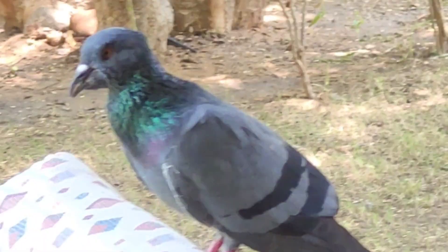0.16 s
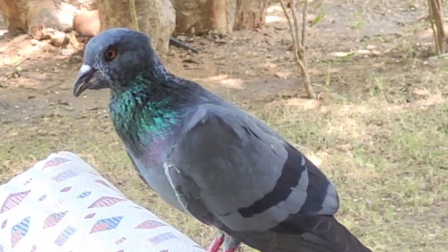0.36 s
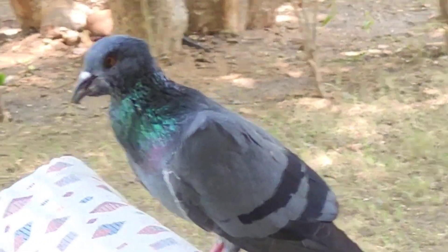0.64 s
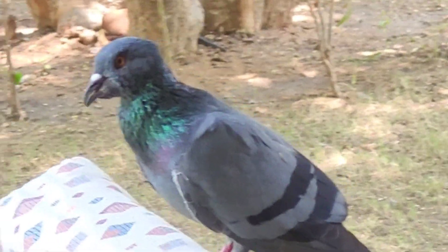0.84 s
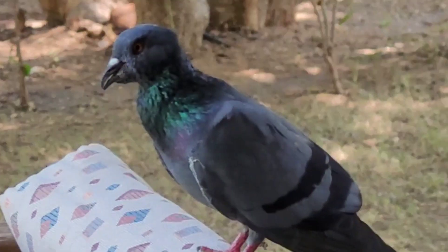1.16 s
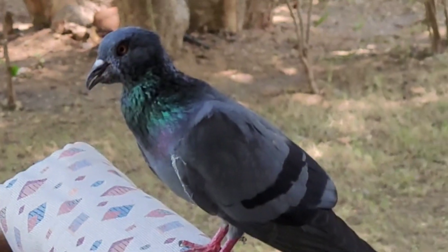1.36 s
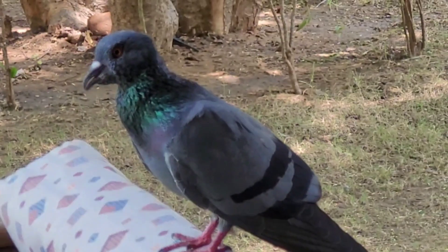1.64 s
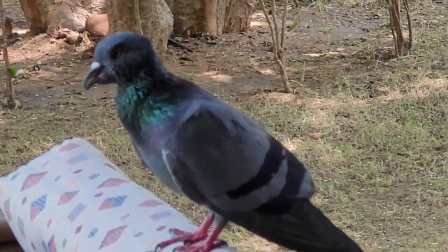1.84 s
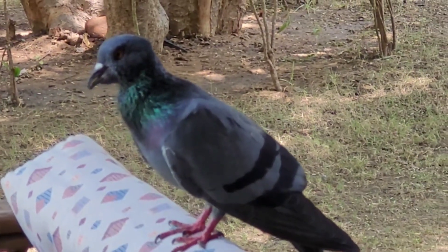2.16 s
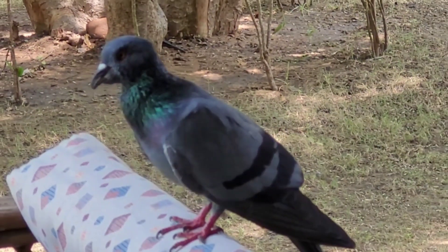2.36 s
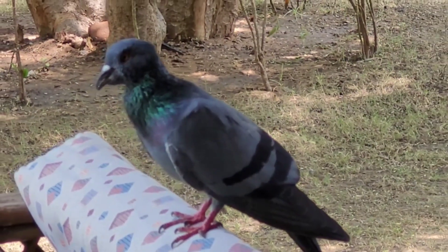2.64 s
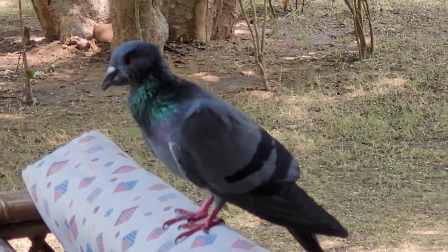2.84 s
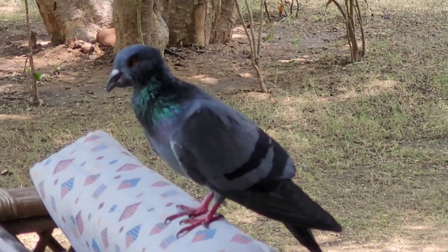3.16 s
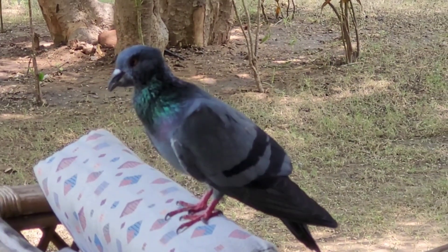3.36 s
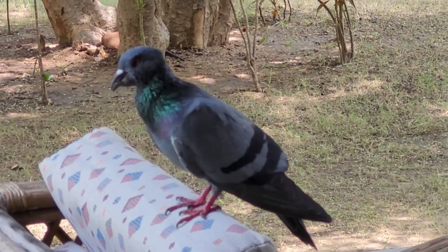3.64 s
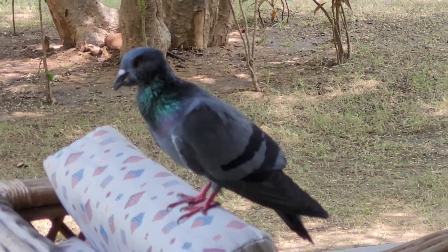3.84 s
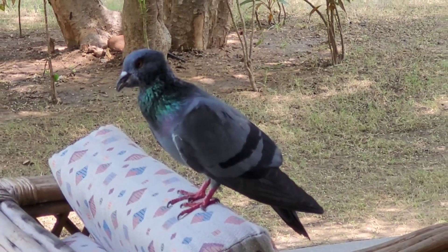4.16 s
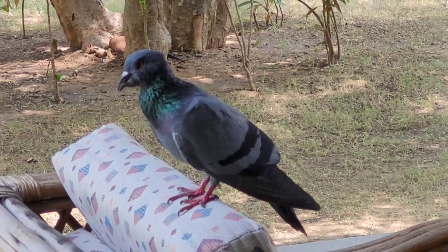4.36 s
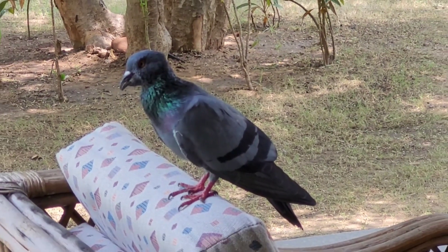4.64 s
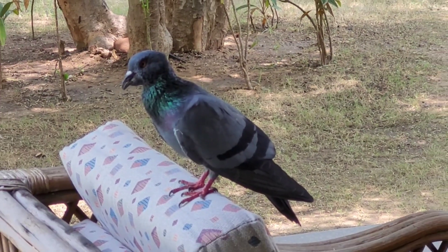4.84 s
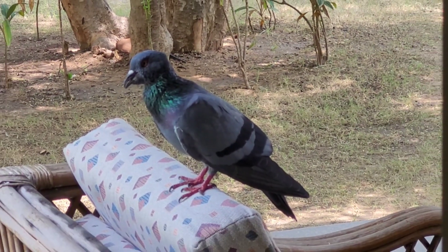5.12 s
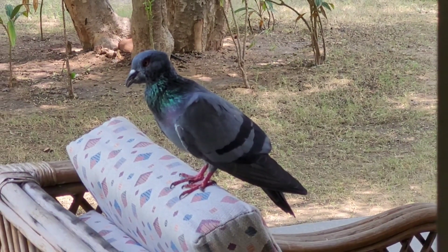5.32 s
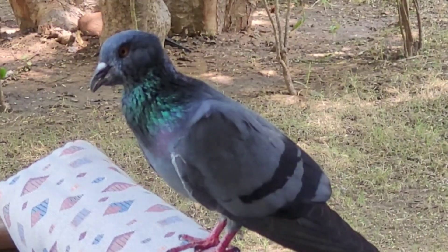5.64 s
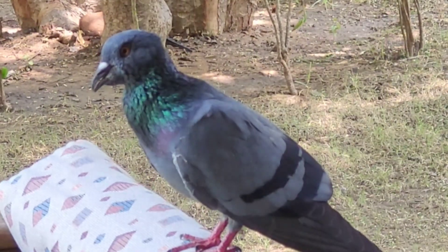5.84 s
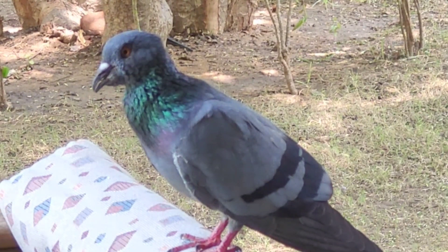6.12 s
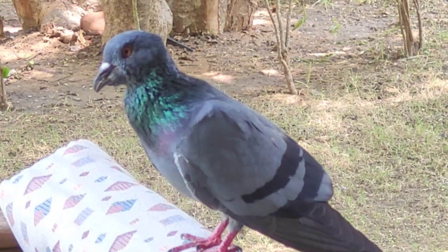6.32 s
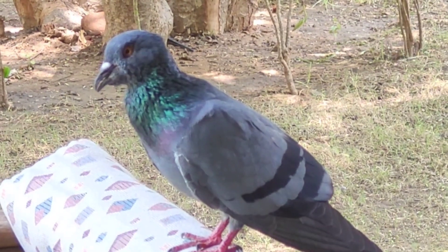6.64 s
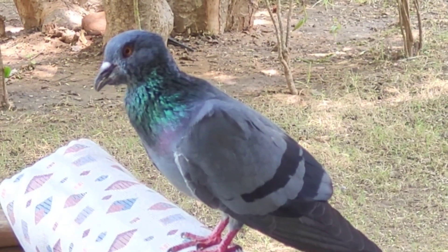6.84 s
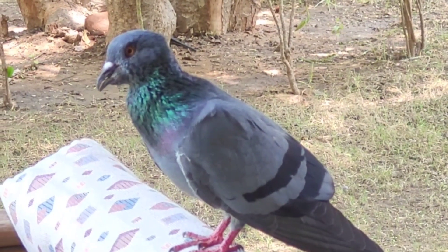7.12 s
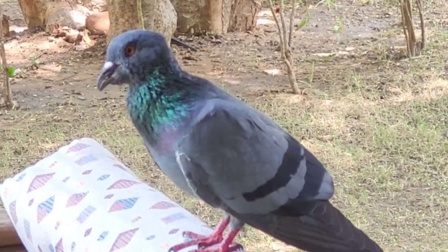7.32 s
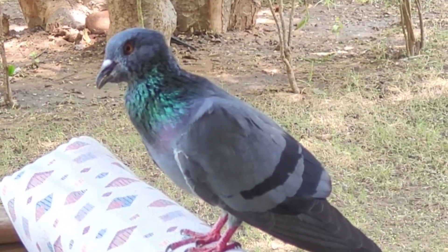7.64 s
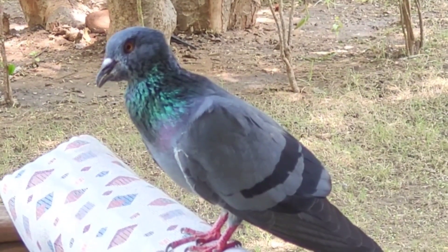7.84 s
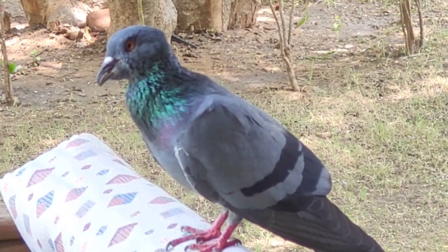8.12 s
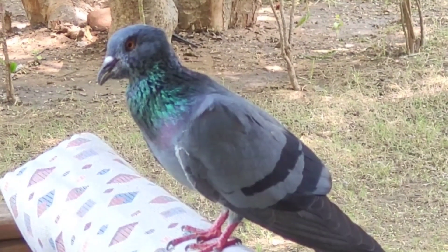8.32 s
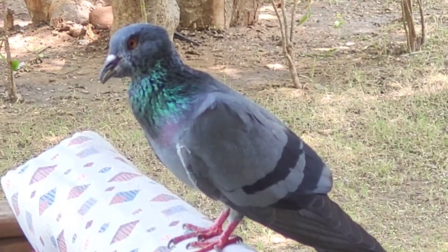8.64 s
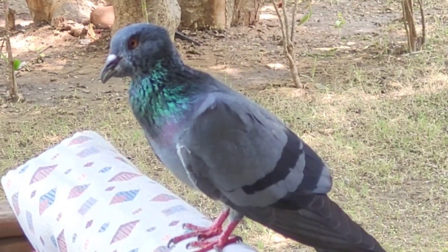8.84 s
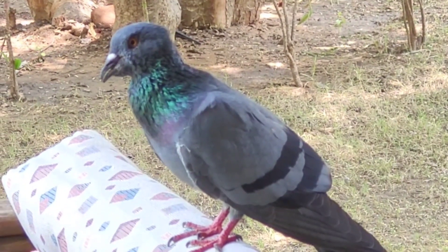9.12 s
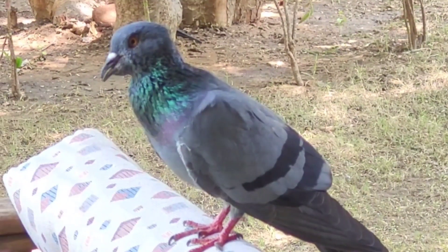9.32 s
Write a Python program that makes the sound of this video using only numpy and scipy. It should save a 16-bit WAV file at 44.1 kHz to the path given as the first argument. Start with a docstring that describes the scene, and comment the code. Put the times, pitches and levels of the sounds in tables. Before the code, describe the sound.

A close garden songbird strings chups, sliding whistles, hoarse screeches and buzzy rasps into quick phrases, with faint distant birds chattering behind.

```python
"""A near babbler in a garden strings chups, slides, whistles, screeches and rasps into quick phrases.
Each kind of syllable has one rule for the pitch and effort of the syrinx, and a throat setting that
weights its partials; ground, walls and trees throw the song back as echoes and scattered tails.
Other birds call far off, a flock comes in bouts of filtered noise, and a soft outdoor hum lies below.
The right microphone is covered: there the near bird is later, faint and dull."""
import sys
import numpy as np
from scipy import signal
from scipy.fft import rfft, irfft, next_fast_len
from scipy.io import wavfile

SR = 44100
rng = np.random.default_rng(int(sys.argv[2]) if len(sys.argv) > 2 else 0)


def put_to_file(sound):
    """Save the sound as 16-bit audio at rate SR, in the file named by the first command-line argument."""
    columns = np.atleast_2d(sound).T  # one column per channel
    safe = np.clip(columns, -1, 1)
    whole_steps = np.round(safe * 32767)
    wavfile.write(sys.argv[1], SR, whole_steps.astype(np.int16))


N = 418068
LEAD = SR // 4  # samples before the start, so that earlier calls still ring
EDGE_HZ = 15750  # upper edge of the band
SILENT_DB = -32.5  # effort at the two ends of a syllable


def gain_of(db):
    """Level law: decibels to an amplitude ratio."""
    return 10 ** (np.asarray(db) / 20)


def evened(x):
    """Power normalisation: scales to rms 1."""
    return x / np.sqrt(np.mean(x ** 2) + 1e-20)


def read(points, hz):
    """Logarithmic pitch scale: interpolates a spectrum along log frequency."""
    f, value = np.transpose(points)
    return np.interp(np.log(hz + 1), np.log(f + 1), value)


def level(curve):
    """Level envelope: gain at every sample from rows of start_s, level_db."""
    return gain_of(np.interp(np.arange(N) / SR, *np.transpose(curve)))


def coloured(x, points):
    """Linear filtering: multiplies the spectrum by gains given in dB."""
    size = next_fast_len(x.shape[-1] + 512)
    gains = gain_of(read(points, np.fft.rfftfreq(size, 1 / SR)))
    return irfft(rfft(x, size) * gains, size)[..., :x.shape[-1]]


def above(x, edge_hz):
    """High-pass filtering: second-order attenuation below the edge."""
    return signal.sosfilt(signal.butter(2, edge_hz, "high", fs=SR, output="sos"), x)


def wander(size, rate_hz):
    """Low-passed noise: smooth random drift of rms about 1, slower than the given rate."""
    hz = np.fft.rfftfreq(next_fast_len(size + SR // 8), 1 / SR)
    noise = rfft(rng.standard_normal(2 * len(hz) - 2))
    return evened(irfft(noise / (1 + (hz / rate_hz) ** 4)))[:size]


def ramp(t, at, over):
    """Raised-sine transition: a smooth step from 0 to 1, centred on a moment."""
    return (1 + np.sin(np.pi * np.clip((t - at) / over, -.5, .5))) / 2


def bump(t, at, width):
    """Gaussian pulse: a bell of height 1."""
    return np.exp(-((t - at) / width) ** 2)


def add(mix, start, sound):
    """Superposition: mixes a sound in at a sample index."""
    part = mix[start:][:len(sound)]
    part += sound[:len(part)]


def song(gesture, rows):
    """Sequencing: places one syllable of a kind at the start time of each row."""
    out = np.zeros(LEAD + N)
    for start_s, *row in rows:
        add(out, LEAD + round(start_s * SR), gesture(*row))
    return out


def scatter(t60, onset):
    """Diffuse reverberation: sparse taps of random sign build up, then decay by band; energy 1."""
    taps = rng.choice([-1., 1.], SR) * (rng.random(SR) < 1 / 10)
    hz, t, z = signal.stft(taps, SR, nperseg=256)
    decay = gain_of(-60 * t / read(t60, hz)[:, None])
    tail = signal.istft(z * decay, SR, nperseg=256)[1][:SR]
    tail *= 1 - np.exp(-(np.arange(SR) / SR / onset) ** 2)
    return tail / np.linalg.norm(tail)


def heard(x, response):
    """Convolution: passes a song through an impulse response and drops the lead-in."""
    return signal.fftconvolve(x, response)[LEAD:LEAD + N]


def effort(t, attack_s, release_s):
    """Breath-pressure envelope: attack, hold and release, in dB."""
    attack = np.maximum(1 - t / attack_s, 0) ** 2
    release = np.maximum(1 - (t[-1] - t) / release_s, 0) ** 2
    return SILENT_DB * (attack + release)


# Resonance curves of the throat, one per setting: frequency_hz, relative gain_db
THROAT_SETTINGS = { "low": [(1100, -14), (1900, -8), (2500, 5.5), (3200, 3), (3900, -15.5), (5000, -10),
                   (5900, -12), (7000, -19), (10000, -28), (13000, -24.5), (14500, -13.5), (16000, -51.5)],
                   "pip": [(1500, -10), (2400, -7), (3400, 4), (4300, -33.5), (7500, -19), (9000, -40),
                   (16000, -38.5)], "pure": [(300, -40), (2500, -23), (3500, -4), (4700, -7), (5600, -18.5),
                   (6600, -23), (7700, -17), (9000, -42), (11000, -33), (13500, -29), (16000, -45)],
                   "flick": [(1500, -32.5), (3400, -6.5), (4800, 6), (6900, -1.5), (8200, -28),
                   (11000, -15.5), (16000, -28.5)], "slide": [(300, -19), (1500, -13.5), (2400, -16),
                   (3500, 8), (5000, -3.5), (6200, -14.5), (7500, -16.5), (10000, -26.5), (12500, -25.5),
                   (15000, -23)], "whistle": [(300, -13), (2000, -21.5), (3200, -12.5), (5000, 0.5),
                   (6200, -13), (7300, -6), (8500, -28.5), (10500, -34.5), (12500, -27), (15300, -28.5)],
                   "screech": [(300, -19), (1900, -35.5), (2400, -35), (2800, -22.5), (3400, -26.5),
                   (4300, -5.5), (5200, 4.5), (5700, -6), (6600, -27), (8000, -14.5), (9200, -23.5),
                   (10700, -23), (15500, -24)], "rasp": [(1300, -47), (1800, -29.5), (2500, -22.5),
                   (3200, -36.5), (4100, -10.5), (5200, 2), (6500, -13), (7800, -18), (9400, -14.5),
                   (11800, -20.5), (13300, -12), (16000, -27.5)], "chip": [(300, -26), (1600, -46),
                   (2400, -22.5), (3100, -20), (3700, 4), (4500, -1.5), (5300, -22.5), (7500, -13.5),
                   (9000, -39), (10600, -20), (16000, -42.5)], "far": [(1300, -44), (2100, 8.5),
                   (2900, 2.5), (3900, -16.5), (5400, 0.5), (6600, -10.5), (8000, -39.5), (16000, -33)]}


def syllable(setting, level_db, hz, effort_db, rough, waver=0.011, jitter=0.042, split=1.0, air=0.12,
             flutter_db=5.5, bright=0.093, fizz_db=-40):
    """Source and filter: a membrane follows the gesture; driven rough, it jitters, period-doubles and hisses."""
    throat = THROAT_SETTINGS[setting]
    t = np.arange(len(hz)) / SR
    rough = np.clip(rough, 0, 1)
    hz = hz * (1 + waver * wander(len(t), rate_hz=230))
    jittered_hz = hz * (1 + jitter * rough * wander(len(t), rate_hz=480))
    phase = 2 * np.pi * np.cumsum(jittered_hz) / SR

    halves = np.arange(2, 2 * int(EDGE_HZ / np.median(hz)) + 4)[:, None]  # odd ones lie between the harmonics
    order = halves / 2
    treble = np.clip(order * hz / 5500 - 1, 0, 1)  # 0 up to 5.5 kHz, 1 from an octave above it
    colour_db = read(throat, order * hz) + bright * treble * effort_db  # soft notes are duller
    heights = gain_of(colour_db) * np.where(halves % 2, 2 * split * rough ** 2, 1)
    heights *= order * hz < SR / 2
    heights /= np.sqrt((heights ** 2).sum(0) / 2)

    # high partials lose their line as the phase frays
    drift = wander(treble.size, rate_hz=580).reshape(treble.shape)
    fray = 1.7 * np.sqrt(rough) * (treble + np.minimum(rough, 1 / 2) ** 2) * drift
    start_phase = rng.uniform(0, 2 * np.pi, order.shape)
    tone = (heights * np.cos(order * phase + fray + start_phase)).sum(0)

    hiss = air * rough * evened(coloured(rng.standard_normal(len(t)), throat))
    open_bill_air = evened(above(rng.standard_normal(len(t)), 7000))
    fizz = gain_of(fizz_db) * np.sqrt(rough) * open_bill_air
    loudness = gain_of(level_db + effort_db + flutter_db * rough * wander(len(t), rate_hz=320))
    window = signal.windows.tukey(len(t), .04)
    return above((tone + hiss + fizz) * loudness * window, edge_hz=1300)


# Spectrum of the outdoor hum: frequency_hz, relative density_db
HUM_SPECTRUM = [(25, -44), (60, -16.5), (90, -4.5), (150, -6.5), (380, -2.5), (520, -7), (680, -16.5),
                (850, -12), (1250, -24), (3000, -18.5), (7000, -44.5), (15500, -33)]
# Level of the hum: start_s, level_db
HUM_LEVEL = [(1.4, -65), (1.9, -69), (2.35, -64.5), (3.0, -68), (3.9, -66.5), (4.3, -65), (5.7, -63),
             (6.4, -67.5)]


def hum():
    """Incoherent ambient noise: soft and low, unrelated at the two ports."""
    return evened(coloured(rng.standard_normal((2, N)), HUM_SPECTRUM)) * level(HUM_LEVEL)


# Blended spectrum of many distant voices: frequency_hz, relative gain_db
FLOCK_SPECTRUM = [(800, -27), (1500, -13), (2400, -5), (3300, -4), (4400, 2.5), (5400, -2), (6500, -9),
                  (8000, -28), (10000, -39.5)]
# Bouts of chatter in the distant flock: middle_s, bell_width_s, level_db
FLOCK_BOUTS = [(0, 0.76, -68.5), (2.965, 0.64, -73), (5.764, 0.5, -59), (6.67, .35, -54),
               (8.406, 1.34, -66.5)]
FLOCK_REST_DB = -84.5  # floor under the bouts


def flock(swell_db=1.0):
    """Incoherent summation: many far voices blur into a high, restless wash that comes in bouts."""
    wash = evened(coloured(rng.standard_normal((2, N)), FLOCK_SPECTRUM))
    bouts = gain_of(FLOCK_REST_DB)
    for middle_s, width_s, level_db in FLOCK_BOUTS:
        bouts = bouts + gain_of(level_db) * bump(np.arange(N) / SR, middle_s, width_s)
    return wash * bouts * gain_of(swell_db * wander(N, rate_hz=9))


# Squawks far off, before the distant path: start_s, length_s, level_db, top_hz
FAR_SQUAWKS = [(0.495, .11, -69, 2320), (2.625, 0.14, -59, 3196), (2.837, 0.14, -56.5, 2720),
               (3.066, 0.09, -64, 2483), (3.282, 0.066, -63.5, 2793)]


def squawk(length, level_db, top_hz, crest_share=0.33, droop_share=0.52, swell_db=6, rough=.6):
    """Parabolic frequency sweep: a hoarse arch that swells into its long fall."""
    t = np.arange(0, length, 1 / SR)
    swelling_db = level_db + swell_db * (t / length - 1 / 2)
    hz = top_hz * (1 - droop_share * (t / length - crest_share) ** 2)
    return syllable("far", swelling_db, hz, effort(t, attack_s=0.014, release_s=0.011), rough)


def peep(level_db, length_s, start_hz, end_hz, rough):
    """Linear frequency sweep: a plain glide."""
    t = np.arange(0, length_s, 1 / SR)
    hz = start_hz + (end_hz - start_hz) * t / length_s
    return syllable("whistle", level_db, hz, effort(t, attack_s=0.012, release_s=0.016), rough,
                    waver=0.022, air=.6, bright=0.34)


SEESAW_START_S, SEESAW_PERIOD_S, SEESAW_GAP_S = 2.8, .188, 0.033  # gap: falling to rising onset


def seesaw(count=6):
    """Periodic repetition: a far bird's falling and rising peeps at an even pace."""
    out = np.zeros(LEAD + N)
    for s in SEESAW_START_S + SEESAW_PERIOD_S * np.arange(count):
        falling = peep(level_db=-57.5, length_s=.032, start_hz=5100, end_hz=3760, rough=.35)
        add(out, LEAD + round(s * SR), falling)
        rising = peep(level_db=-60, length_s=.05, start_hz=4600, end_hz=5980, rough=0.45)
        add(out, LEAD + round((s + SEESAW_GAP_S) * SR), rising)
    return out


def far_birds(direct_db=-6, trees_db=-1):
    """Diffuse field beyond the direct field: distant calls arrive mostly by way of the trees."""
    voice = song(squawk, FAR_SQUAWKS) + seesaw()
    ports = []
    for port in range(2):
        by_trees = heard(voice, scatter([(1000, 0.58)], onset=.006))
        ports.append(gain_of(direct_db) * voice[LEAD:] + gain_of(trees_db) * by_trees)
    return np.array(ports)


# Echoes off ground and walls: delay_s, relative level_db
GROUND_AND_WALLS = [(.0031, -17.5), (.0074, -16.5), (0.0095, -14.5), (0.018, -22), (0.027, -20.5),
                    (0.04, -23.5)]
# Colour of everything thrown back: frequency_hz, gain_db
REFLECTION_COLOUR = [(500, -2), (3400, 8), (4300, -4), (5500, -4.5), (8000, -7.5), (16000, -16.5)]
# Decay time among the trees: frequency_hz, t60_s
TREES_T60 = [(500, 0.37), (3000, 0.31), (5000, 0.36), (8000, 0.23), (15000, 0.21)]


def garden(echo_db, porch_db, trees_db, porch_t60=0.088):
    """Impulse response of one port: direct sound, echoes, the porch's short ring, the trees' longer one."""
    porch = gain_of(porch_db) * scatter([(1000, porch_t60)], onset=0.0054)
    trees = gain_of(trees_db) * scatter(TREES_T60, onset=0.022)
    back = porch + trees
    for delay_s, level_db in GROUND_AND_WALLS:
        add(back, round(delay_s * SR), gain_of([level_db + echo_db]))
    response = coloured(back, REFLECTION_COLOUR)
    response[0] += 1
    return response


# Chups, low notes that dip and climb back; hitch_hz scales a kink in the climb:
# start_s, length_s, level_db, top_hz, bottom_hz, hitch_hz
CHUP_NOTES = [(0.048, 0.081, -27, 3010, 1267, 905), (.345, 0.075, -26.5, 2910, 1264, 691),
              (.635, 0.077, -27.5, 2978, 1300, 500), (4.047, 0.071, -21, 3063, 1823, -2),
              (4.308, .082, -23, 3063, 1522, 290.5), (4.573, 0.081, -25.5, 3024, 1240, 900.5),
              (4.851, 0.081, -24, 3025, 1203, 885)]


def chup(length, level_db, top_hz, bottom_hz, hitch_hz, dip_share=.17, drop_share=.1, climb_share=.3,
         hitch_share=.48, hitch_s=0.0076, soft_db=-13, rough_low=0.34, rough_top=0.091):
    """Coupled pitch and force: soft and rough in the dip, loud and clean once it has climbed."""
    t = np.arange(0, length, 1 / SR)
    u, hitch = t / length, (t - hitch_share * length) / hitch_s
    dip = bump(u, dip_share, np.where(u < dip_share, drop_share, climb_share))
    hz = top_hz - (top_hz - bottom_hz) * dip - hitch_hz * hitch * np.exp(-hitch ** 2)
    low = 1 - ramp(u, at=0.39, over=0.24)
    force = effort(t, attack_s=.005, release_s=.024) + soft_db * low
    return syllable("low", level_db, hz, force, rough_top + rough_low * low,
                    air=.1, split=0.2, bright=.2, fizz_db=-28.5)


# Tews, the falling answers to the chups: start_s, length_s, level_db, top_hz, resting_hz, fall_time_s
TEW_NOTES = [(-.065, 0.053, -19.5, 5210, 3715, .02), (.189, 0.061, -19, 5200, 3750, 0.0086),
             (.459, 0.056, -13, 4845, 3794, .02), (0.767, 0.06, -15, 5100, 3750, 0.017),
             (4.433, 0.055, -14.5, 5090, 3700, 0.017), (4.693, 0.058, -15, 5360, 3445, 0.019),
             (4.965, 0.059, -12.5, 5215, 3570, .02)]


def tew(length, level_db, top_hz, rest_hz, fall_s, crest_s=.009, scoop_hz=600, sag_db=9.5, rough=0.11):
    """Exponential relaxation: flicks up to a crest, then relaxes in pitch and force."""
    t = np.arange(0, length, 1 / SR)
    fall = np.exp(-np.maximum(t - crest_s, 0) / fall_s)
    hz = rest_hz + (top_hz - rest_hz) * fall - scoop_hz * np.maximum(1 - t / crest_s, 0)
    force = effort(t, attack_s=0.019, release_s=0.0045) - sag_db * ramp(t, at=0.033, over=0.041)
    return syllable("pure", level_db, hz, force, rough, bright=0.13, fizz_db=-31)


# A soft note that leaps to a loud one: start_s, length_s, level_db, pitch_hz, leap_hz
FLICK_NOTES = [(4.125, 0.087, -6, 3600, 1418)]


def flick(length, level_db, low_hz, leap_hz, creep_hz=330, creep_db=13, soft_db=-15, leap_s=.052,
          droop_hz=350, rough=0.088):
    """Register jump: creeps up softly, then leaps in pitch and force at once."""
    t = np.arange(0, length, 1 / SR)
    early, leapt = np.maximum(1 - t / leap_s, 0), ramp(t, leap_s, over=0.02)
    hz = low_hz - creep_hz * early + leap_hz * leapt - droop_hz * ramp(t, at=.068, over=0.015)
    force = effort(t, attack_s=0.01, release_s=0.031) - creep_db * early + soft_db * (1 - leapt)
    return syllable("flick", level_db, hz, force, rough)


# Chucks, clean notes that break into a scrape: start_s, length_s, level_db, pitch_hz
CHUCK_NOTES = [(5.124, 0.078, -26.5, 3230), (5.358, 0.075, -26.5, 3273)]


def chuck(length, level_db, top_hz, dip_hz=350, scrape_s=.049, scrape_width_s=.011, lurch_hz=300,
          rough_clean=.03, rough_scrape=1.0):
    """Irregular vibration: a shallow dip, then the membrane lurches out of tune."""
    t = np.arange(0, length, 1 / SR)
    scrape = bump(t, scrape_s, scrape_width_s)
    lurch = scrape * (lurch_hz * wander(len(t), rate_hz=415) - dip_hz)
    hz = top_hz - dip_hz * bump(t, at=0.02752, width=.015) + lurch
    return syllable("low", level_db, hz, effort(t, attack_s=0.027, release_s=0.017),
                    rough_clean + rough_scrape * scrape, split=1.0, flutter_db=4, fizz_db=-35)


# Two-voiced slides: start_s, length_s, level_db, fall_time_s, loud_for_s,
# second_voice_hz, second_level_db, second_attack_s
SLIDE_NOTES = [(1.19, .1, -13, .036, 0.092, 5850, -18, 0.032),
               (1.352, 0.0943, -10, .026, 0.056, 4800, -21, 0.0054),
               (6.399, .11, -11.5, 0.042, 0.083, 5930, -19.5, 0.021),
               (6.561, .095, -13, 0.037, 0.057, 5150, -14.5, 0.014),
               (8.579, 0.11, -12, .037, 0.085, 5836, -21, 0.0269),
               (8.746, 0.11, -13.5, 0.031, 0.051, 5100, -18.5, .015)]


def slide(length, level_db, fall_s, loud_s, side_hz, side_db, side_attack_s, top_hz=6900, rest_hz=3250,
          hold_s=.018, plunge_hz=1900, plunge_s=0.012, push_db=11, soft_db=-19, tail_db=-16, merge=11,
          rough=0.17):
    """Two coupled sources: one side of the syrinx glides down and sweeps the other's held note along."""
    t = np.arange(0, length, 1 / SR)
    glide = rest_hz + (top_hz - rest_hz) * np.exp(-np.maximum(t - hold_s, 0) / fall_s)
    tail = tail_db * ramp(t, loud_s, over=0.052)
    soft_start = soft_db * (1 - ramp(t, at=0.027, over=.03))
    force = effort(t, attack_s=0.02, release_s=0.016) + soft_start + tail
    plunge = np.maximum(1 - (length - t) / plunge_s, 0)  # a last push as the pitch collapses
    main = syllable("slide", level_db, glide - plunge_hz * plunge, force + push_db * plunge, rough,
                    air=.08, fizz_db=-20.5)
    held = side_hz / (1 + (side_hz / glide) ** merge) ** (1 / merge)  # smooth minimum of the two pitches
    side_force = effort(t, side_attack_s, release_s=0.013) + tail
    return main + syllable("slide", side_db, held, side_force, rough)


# Pips, soft arches in threes: start_s, length_s, level_db, top_hz
PIP_NOTES = [(1.501, 0.038, -35.5, 3300), (1.548, 0.038, -29.5, 3210), (1.596, 0.033, -30.5, 3250),
             (6.711, 0.049, -35.5, 3680), (6.755, 0.05, -33, 3480), (6.798, 0.043, -32, 3747),
             (8.904, .033, -32.5, 3440), (8.948, 0.0442, -29.5, 3450), (8.997, 0.036, -26.5, 3385)]


def pip(length, level_db, top_hz, crest_share=.66, dip_share=0.42, rough=.15):
    """Sinusoidal frequency sweep: a quick arch that ends higher than it began."""
    t = np.arange(0, length, 1 / SR)
    hz = top_hz * (1 - dip_share * np.cos(np.pi / 2 * t / length / crest_share) ** 2)
    return syllable("pip", level_db, hz, effort(t, attack_s=0.017, release_s=0.0086), rough,
                    waver=0.011, bright=.3)


# Screeches: start_s, length_s, level_db, pitch_hz, warble_crest_s, warble_period_s, warble_depth (share),
# roughness (0-1), sag_db, droop (share)
SCREECH_NOTES = [(2.279, .152, -13.5, 2656, .082, .03, 0.071, 0.33, 5, .3),
                 (7.341, 0.15, -11, 2646, .078, 0.026, .045, 0.21, 9.5, 0.19),
                 (7.73, 0.16, -11.5, 2661, .095, 0.015, 0.034, 0.14, 7, 0.138),
                 (8.155, 0.15, -12.5, 2589, .088, 0.024, 0.054, 0.16, 17, 0.13)]


def screech(length, level_db, top_hz, crest_s, period_s, warble, rough, sag_db, droop_share,
            scoop_share=.5, rise_s=0.025, rise_power=1.5, rough_start=0.33):
    """Frequency modulation: scoops up hoarsely, warbles at the top and droops as the force runs out."""
    t = np.arange(0, length, 1 / SR)
    tired = ramp(t, length, over=0.18) * 2
    wobble = warble * ramp(t, at=0.086, over=.04) * np.cos(2 * np.pi * (t - crest_s) / period_s)
    scoop = scoop_share * np.exp(-(t / rise_s) ** rise_power)
    hz = top_hz * (1 - scoop - droop_share * tired ** 2 + wobble)
    force = effort(t, attack_s=0.047, release_s=0.012) - sag_db * tired
    roughness = rough + rough_start * (1 - ramp(t, at=0.034, over=0.017))
    return syllable("screech", level_db, hz, force, roughness, air=0.36, split=0.52, fizz_db=-28.5)


# Chips, one after each screech: start_s, level_db, pitch_hz
CHIP_NOTES = [(2.508, -21, 1469), (7.559, -16, 1529), (7.958, -18, 1513), (8.374, -21, 1556)]


def chip(level_db, top_hz, length_s=.048, fall_share=0.39, rough_start=0.052, rough_end=0.79):
    """Accelerating frequency sweep: a short buzz that falls ever faster and frays."""
    t = np.arange(0, length_s, 1 / SR)
    fall = (t / length_s) ** 2
    roughness = rough_start + (rough_end - rough_start) * fall
    return syllable("chip", level_db, top_hz * (1 - fall_share * fall),
                    effort(t, attack_s=.017, release_s=0.031), roughness)


# Rasps, a held buzz and then a rattle: start_s, length_s, level_db, pitch_hz, rattle_period_s, sag_db
RASP_NOTES = [(5.665, 0.13, -14, 1322, 0.023, 3.5), (5.856, 0.13, -15, 1285, 0.032, 6.5),
              (6.07, 0.12, -17, 1356, .027, 6)]


def rasp(length, level_db, top_hz, period_s, sag_db, crest_s=0.026, scoop_share=0.29, break_s=.042,
         rattle_hz=1120, swing_hz=150, first_swing_s=.06, throb_db=2.0, rough_held=0.15, rough_rattle=0.27):
    """Joint frequency and amplitude modulation: a low buzz arches, then breaks into a rough rattle."""
    t = np.arange(0, length, 1 / SR)
    broken = ramp(t, break_s, over=0.017)
    held = top_hz * (1 - scoop_share * np.minimum(abs(t / crest_s - 1), 1) ** (5 / 2))
    swing = np.cos(2 * np.pi * (t - first_swing_s) / period_s)
    rattle = rattle_hz + swing_hz * swing
    sag = sag_db * ramp(t, at=0.052, over=.05)
    force = effort(t, attack_s=0.019, release_s=0.0076) - sag + throb_db * swing * broken
    return syllable("rasp", level_db, held + (rattle - held) * broken, force,
                    rough_held + rough_rattle * broken, air=0.063, split=.4, jitter=0.035, flutter_db=4.5)


# Whistles that rise, break into a yodel and sink:
# start_s, length_s, level_db, top_hz, loud_for_s, first_flick_s, sag_db
WHISTLE_NOTES = [(6.949, 0.21, -12, 5323, 0.1365, .103, 5), (9.137, .2, -10.5, 5432, 0.1514, .098, 0.5)]


def whistle(length, level_db, top_hz, loud_s, yodel_s, sag_db, scoop_hz=2000, rise_s=.028,
            period_s=.0238, yodel_hz=650, gap_db=-32, sink_hz=2150, tail_db=-21, rough_held=0.069,
            rough_yodel=0.17):
    """Yodel modulation: rises to a plateau, breaks into quick downward flicks and sinks away softly."""
    t = np.arange(0, length, 1 / SR)
    spent = ramp(t, loud_s, over=0.0164)
    broken = ramp(t, yodel_s - period_s / 2, over=0.02)
    turn = 2 * np.pi * (t - yodel_s) / period_s
    yodel = broken * (1 - spent)
    rise = top_hz - scoop_hz * np.exp(-t / rise_s)
    hz = rise + yodel_hz * yodel * np.cos(turn) - sink_hz * ramp(t, loud_s, over=.056)
    gaps = gap_db * yodel * ((1 - np.sin(turn)) / 2) ** 2  # soft between the flicks
    force = effort(t, attack_s=.036, release_s=0.036) + gaps + tail_db * spent - sag_db * broken
    return syllable("whistle", level_db, hz, force, rough_held + rough_yodel * broken,
                    split=.3, air=0.089, fizz_db=-31.5)


# A thin, hoarse note: start_s, length_s, level_db, pitch_hz
TSEE_NOTES = [(9.356, 0.051, -25, 6080)]


def tsee(length, level_db, hz, lift_hz=700, rough=0.48):
    """Smooth frequency step: a hoarse high note that lifts at its end."""
    t = np.arange(0, length, 1 / SR)
    lifted_hz = hz + lift_hz * ramp(t, at=0.041, over=0.011)
    return syllable("whistle", level_db, lifted_hz, effort(t, attack_s=0.029, release_s=0.0059), rough)


# Transmission of the right cover for near sounds: frequency_hz, gain_db
COVER_NEAR = [(60, -6), (130, -18), (380, -23.5), (1200, -17.5), (2500, -26), (4800, -27), (7500, -23.5),
              (9000, -41), (15000, -41)]


def near_bird():
    """Interaural-style differences: left of centre, so the covered right port is later, weaker, more echoic."""
    kinds = [(chup, CHUP_NOTES), (tew, TEW_NOTES), (flick, FLICK_NOTES), (chuck, CHUCK_NOTES),
             (slide, SLIDE_NOTES), (pip, PIP_NOTES), (screech, SCREECH_NOTES), (chip, CHIP_NOTES),
             (rasp, RASP_NOTES), (whistle, WHISTLE_NOTES), (tsee, TSEE_NOTES)]
    voice = above(sum(song(gesture, rows) for gesture, rows in kinds), edge_hz=87)
    left = heard(voice, garden(echo_db=1.5, porch_db=-9, trees_db=-24.0))
    later = np.roll(voice, 20)  # samples
    right = heard(later, garden(echo_db=-7.0, porch_db=-3.5, trees_db=-6.5))  # same garden, other paths
    return gain_of(-0.67) * np.array([left, coloured(right, COVER_NEAR)])


# Transmission of the right cover for the faint ambience: frequency_hz, gain_db
COVER_AMBIENCE = [(60, -5.5), (130, -10.5), (380, -14), (700, -10.5), (1300, -5), (2400, -8), (4500, -7.5),
                  (8000, 0.5), (15000, -5.5)]


def scene():
    """Superposition: the near bird over the ambience of the garden."""
    left, right = far_birds() + flock() + hum()
    return near_bird() + np.array([left, coloured(right, COVER_AMBIENCE)])


def record(dry):
    """Band limiting: a linear-phase low-pass at the upper band edge."""
    lowpass = signal.firwin(401, EDGE_HZ, window=("kaiser", 9), fs=SR)
    return signal.oaconvolve(dry, lowpass[None], "same")


dry = scene()
out = record(dry)
put_to_file(out)
```